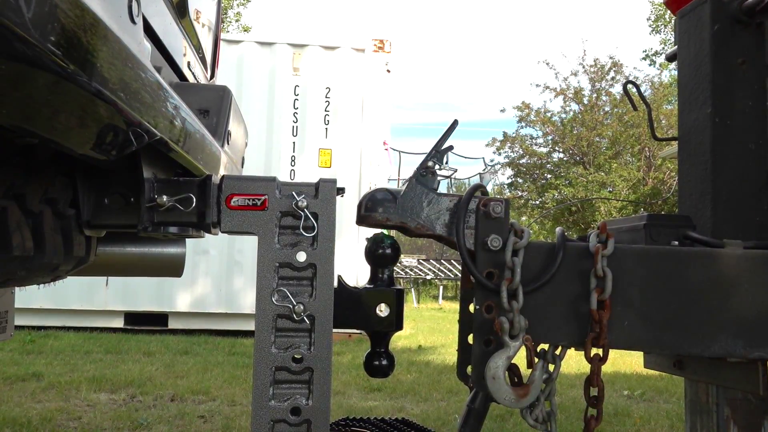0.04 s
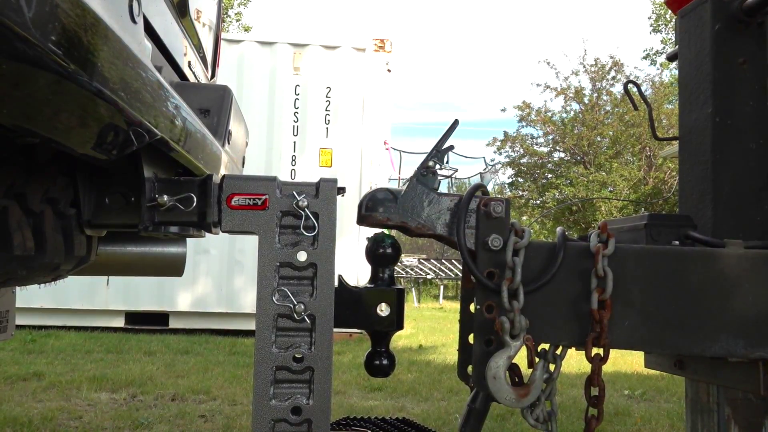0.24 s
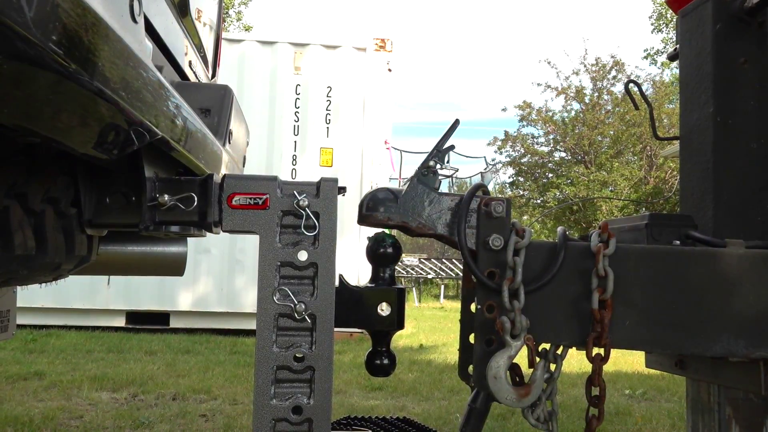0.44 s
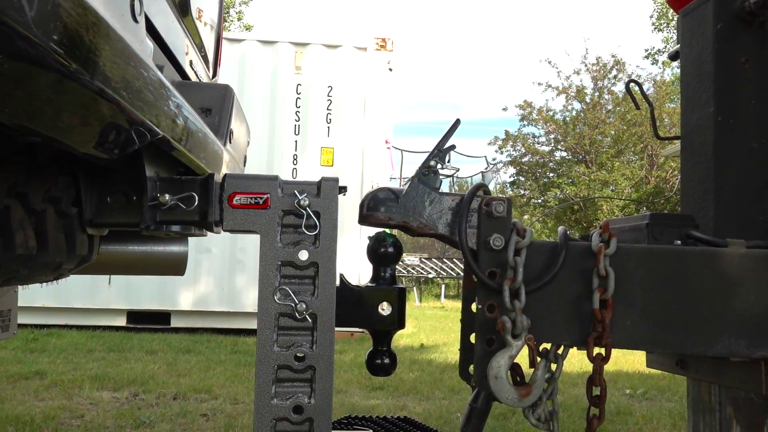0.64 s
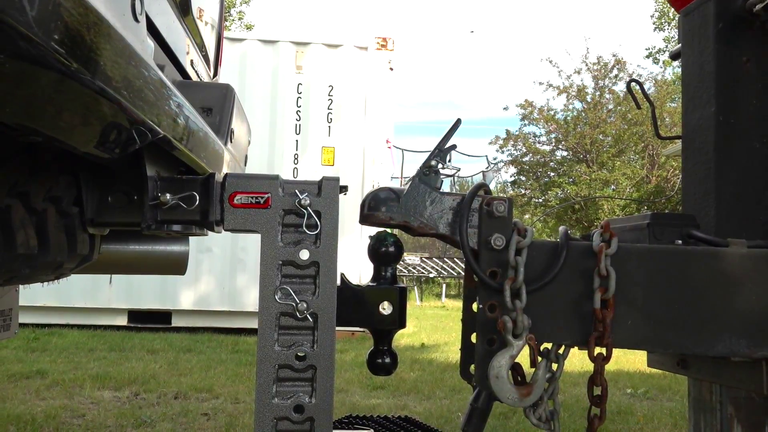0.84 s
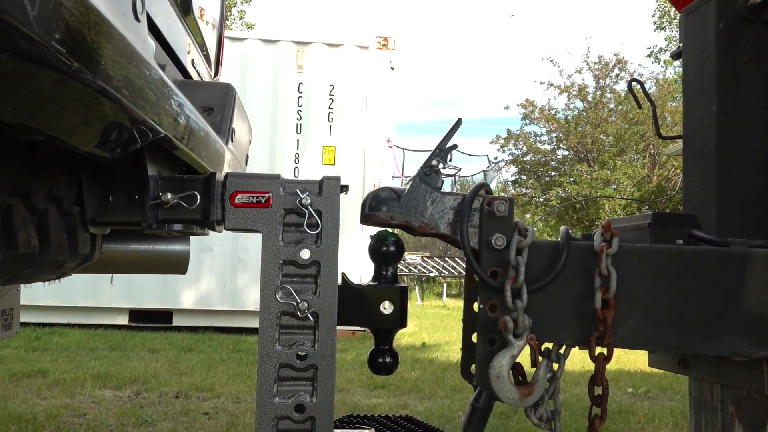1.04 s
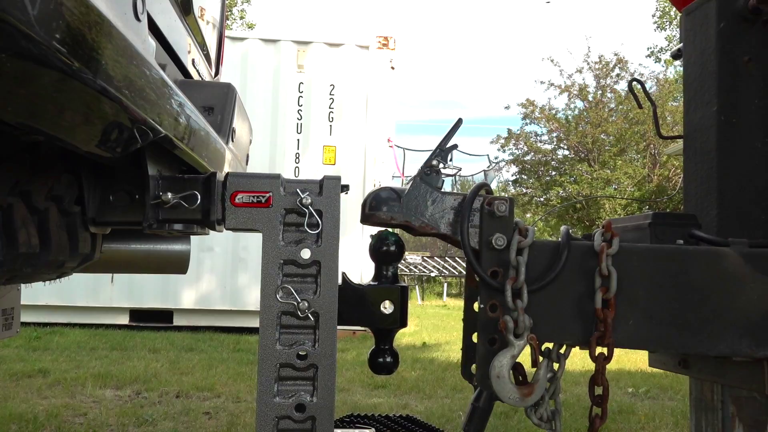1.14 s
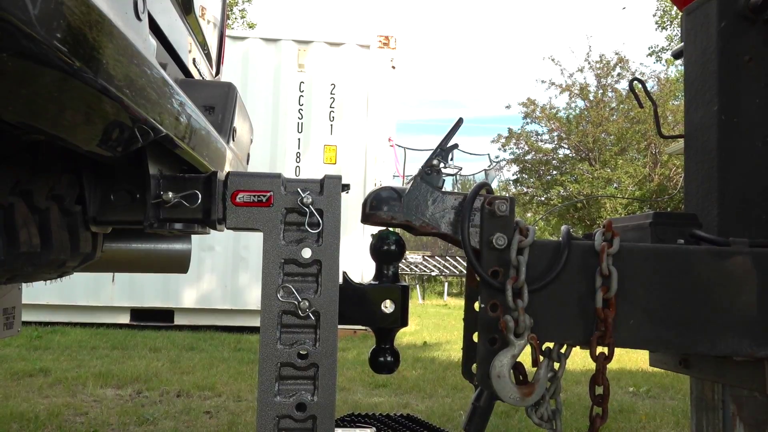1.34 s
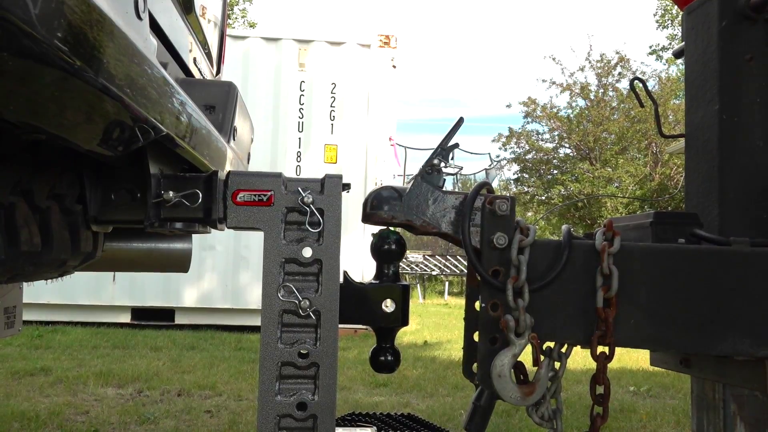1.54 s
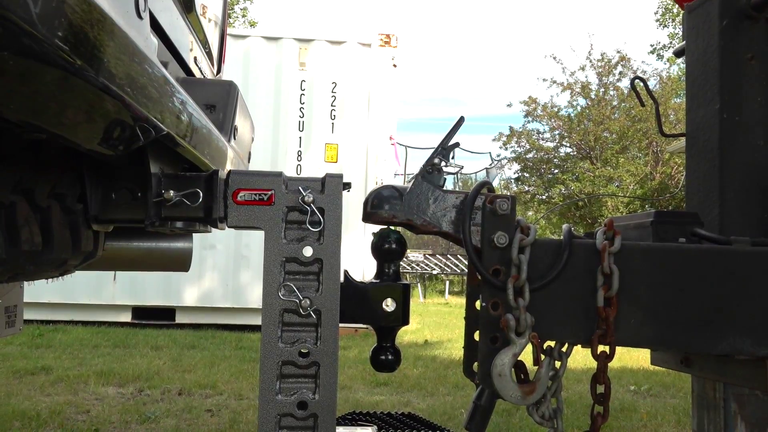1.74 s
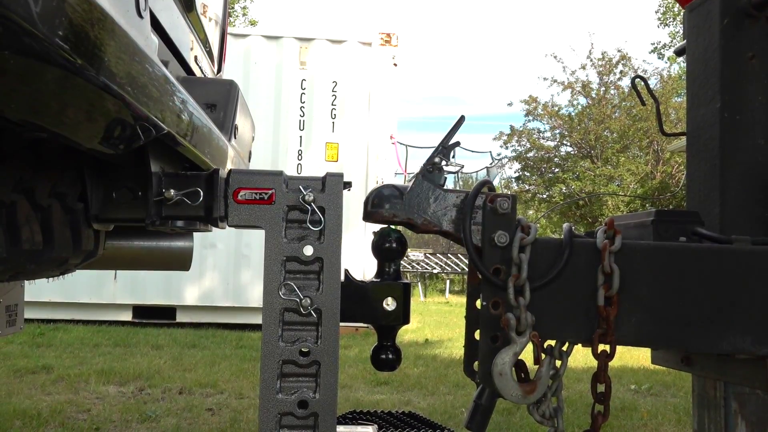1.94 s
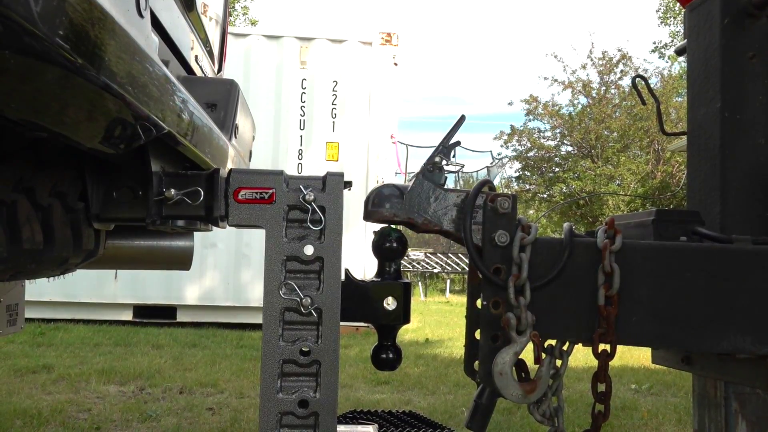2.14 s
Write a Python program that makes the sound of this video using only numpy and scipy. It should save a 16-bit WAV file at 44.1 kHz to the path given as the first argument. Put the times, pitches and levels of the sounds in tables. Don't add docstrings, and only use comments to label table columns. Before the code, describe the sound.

Trailer hitch metal squeaks and scrapes briefly, then clanks and clinks, above a faint engine idle

```python
import sys
import numpy as np
from scipy import signal
from scipy.io import wavfile
from scipy.ndimage import uniform_filter1d

SR = 44100
rng = np.random.default_rng(int(sys.argv[2]) if len(sys.argv) > 2 else 0)


def natural_amplitude(level_db):
    exponent = np.asarray(level_db, float) / 20
    return 10 ** exponent


def bounce(signal):
    frames = np.transpose(np.atleast_2d(signal))
    limited = np.clip(frames, -1, 1)
    pcm = np.round(limited * 32767).astype(np.int16)
    wavfile.write(sys.argv[1], SR, pcm)


N = 97020

# centre_hz, density_db_per_hz
YARD_SPECTRUM = [(95, -6), (180, -16.5), (300, -8.5), (800, -12), (2250, -16.5), (5500, -22), (8000, -53),
                 (16000, -41)]
CYLINDER_LEVELS_DB = [2, -4, -1.5, 1.5, -10.5, 2, -10, -2]
# centre_hz, width_hz, level_db
EXHAUST_MODES = [(40, 22, -6.5), (79.4, 30, -2.5), (90, 18.3, 3.5), (318, 21, -2.5), (410, 110, -8)]
# start_s, length_s, pitch_hz, level_db, strongest_harmonic
SQUEAKS = [(0.022, 0.02, 1355, -46, 0.85), (0.206, 0.059, 1755, -39, 1.49),
           (0.251, 0.041, 1778, -39.5, 1.62), (0.273, 0.059, 1911, -30, 1.43),
           (0.304, 0.038, 3034, -27.5, 0.79), (.337, 0.022, 3122, -19, 0.42),
           (0.351, 0.014, 1524, -28.5, 2), (.388, 0.02, 2210, -32.5, .9), (0.415, 0.035, 1560, -26.5, 2.7),
           (0.436, 0.012, 1403, -25.5, 0.96), (0.484, 0.072, 5910, -38.5, 0.83),
           (0.333, 0.014, 1050, -33.5, 0.72), (0.441, 0.042, 1747, -33.5, 0.59),
           (0.467, 0.075, 1879, -20, 1.4), (0.564, 0.019, 4190, -29, 0.46), (0.567, 0.035, 7180, -35, 0.67),
           (0.616, 0.027, 1603, -48.5, 0.82), (0.655, 0.028, 1867, -42.5, 1.46),
           (0.675, 0.019, 1626, -46.5, 0.89), (1.535, 0.051, 1480, -59.5, 0.83)]
# start_s, length_s, level_db, colour_hz
STROKES = [(0.169, 0.019, -49, 3110), (0.189, 0.018, -52, 1590), (0.224, 0.028, -40, 4580),
           (0.234, 0.27, -45.5, 2200), (0.278, 0.068, -40.5, 3670), (0.306, 0.048, -32.5, 3360),
           (0.336, 0.043, -27.5, 3860), (0.376, 0.039, -29, 3486), (0.406, 0.038, -32, 3664),
           (0.427, 0.029, -27, 3360), (0.483, 0.052, -35.5, 4686), (0.533, 0.16, -55, 3110),
           (0.577, 0.014, -54, 5030), (0.657, 0.02, -47, 2960), (0.698, 0.029, -51.5, 1400),
           (0.37, 0.16, -45, 1000), (1.577, 0.045, -43, 2200), (1.602, 0.088, -59.5, 1100),
           (1.996, 0.072, -64, 3000), (2.046, 0.057, -52, 3840), (1.17, 0.083, -48.5, 695),
           (1.235, 0.19, -58.5, 517), (0.973, 0.24, -68, 4320), (2.008, 0.041, -55, 1100),
           (2.058, 0.031, -55, 890), (0.534, 0.19, -51, 1740)]
# centre_hz, width_hz, level_db
COUPLER_MODES = [(1340, 330, 7), (1934, 12, 7.5), (2200, 6.2, -14), (2960, 250, 3.5), (4040, 120, 3.5),
                 (4550, 47, 5.5), (6167, 59, 3), (7300, 38, -14), (8120, 68, -39.5)]
# start_s, peak_db, colour_hz, t60_s
KNOCKS = [(0.172, -48, 3400, 0.049), (.198, -32, 950, 0.32), (0.205, -26, 3170, 0.083),
          (.664, -32, 3100, 0.054), (1.044, -28.5, 1740, 0.02), (1.127, -30.5, 1710, 0.017),
          (1.18, -14.5, 4400, 0.031), (1.291, -48, 3000, 0.054), (1.543, -45.5, 5300, 0.03),
          (0.283, -33, 3900, 0.053), (0.567, -50.5, 4470, 0.026), (1.449, -35, 5600, 0.073),
          (1.727, -49.5, 6300, 0.037), (1.753, -33.5, 2230, 0.013), (1.828, -50, 4360, 0.097),
          (1.99, -42.5, 4100, 0.036), (2.152, -40.5, 5030, 0.021), (2.163, -40, 5050, 0.054)]
# start_s, length_s, pitch_hz, level_db
CATCHES = [(.209, 0.0099, 3670, -38.5), (.228, .02, 5980, -44.5), (.229, 0.024, 4370, -43),
           (.234, 0.0076, 8950, -52), (.236, 0.013, 7760, -48), (.282, 0.0098, 3586, -35.5),
           (.297, 0.025, 7590, -47.5), (.312, .018, 4270, -41), (.314, .022, 3547, -34),
           (.316, 0.031, 2217, -40.5), (.322, .014, 1318, -40), (.337, 0.011, 3670, -29),
           (.337, .014, 6130, -42), (.344, .013, 3815, -37.5), (.344, .013, 4130, -34.5),
           (.345, .012, 1862, -37.5), (.354, 0.022, 4590, -36.5), (.354, 0.013, 5930, -38),
           (.364, 0.024, 3230, -39), (.373, .014, 1580, -41.5), (.375, 0.027, 3967, -32.5),
           (.381, 0.015, 6270, -35), (.385, .012, 4630, -32.5), (.404, .01, 3760, -35),
           (.405, 0.018, 1618, -35), (.406, 0.029, 6270, -29.5), (.409, 0.03, 7840, -42),
           (.417, 0.025, 4687, -24), (.435, .013, 2710, -43), (.437, 0.0092, 3940, -25),
           (.438, .01, 6700, -39), (.445, 0.015, 2890, -38)]
# start_s, level_db, pitch_hz
THUDS = [
    (0.229, -61, 178),
    (1.059, -61, 188.7),
    (1.201, -61, 157),
    (1.299, -54.5, 129),
    (1.314, -47, 91),
    (2.05, -52.5, 95),
]
# start_s, pitch_hz, level_db, t60_s
RINGS = [(1.044, 881, -37, 0.2), (1.046, 722, -49, 0.3), (1.045, 1787, -37.5, 0.041),
         (1.128, 904, -43.5, 0.16), (1.13, 567, -44, 0.12), (1.24, 757, -36.5, 0.06),
         (1.45, 1050, -51, 0.043), (1.45, 1870, -46.5, 0.058), (1.45, 6510, -41, 0.039),
         (1.45, 7130, -50, 0.054), (1.45, 7700, -42, 0.06), (1.754, 2085, -42.5, 0.042),
         (1.45, 2800, -39, 0.036), (1.582, 2480, -34.5, 0.034), (1.585, 5780, -46.5, 0.15),
         (1.586, 1048, -38, 0.1), (1.589, 1234, -39.5, 0.12), (1.59, 4810, -41.5, 0.049),
         (1.6, 874, -43.5, 0.1), (1.727, 6510, -39, 0.014), (1.755, 3770, -51.5, 0.15),
         (1.755, 7620, -49.5, 0.083), (1.991, 2836, -48.5, 0.05), (1.991, 3790, -52, 0.056),
         (2.163, 6930, -43.5, 0.077), (2.163, 6110, -55, 0.18), (2.163, 4630, -53, 0.088),
         (2.164, 2710, -47, 0.057), (2.165, 1150, -51, 0.077)]
# pitch_hz, level_db, t60_s
HITCH_MODES = [(544, -13, .3), (705, -3, .2), (877, -3, .15), (1593, -10, .065), (1868, -9, .15),
               (1297, -8, .09), (2126, -1, .09), (3585, -2, .05), (4050, 2, .045), (5039, -12, .1),
               (5835, -8, .27), (7000, -13, .1), (8414, -24, .12), (9518, -13, .075)]


def level(x, db):
    return x * natural_amplitude(db) / np.sqrt(np.mean(x ** 2))


def band(x, hz, width_hz):
    return signal.lfilter(*signal.iirpeak(min(hz, 0.4 * SR), max(hz / width_hz, 0.3), fs=SR), x)


def band_twice(x, hz, width_hz):
    return band(band(x, hz, width_hz), hz, width_hz)


def walk(rate_hz, size):
    k = int(SR / rate_hz)
    steps = np.repeat(rng.standard_normal(size // k + 1), k)
    return 1.31 * uniform_filter1d(uniform_filter1d(steps, k), k)[:size]


def swell(size, rise):
    u = np.arange(size) / size
    ramp = np.minimum(u / rise, (1 - u) / (1 - rise))
    return np.sin(np.pi / 2 * np.clip(ramp, 0, 1)) ** 0.91


def decay(t, t60_s):
    return np.exp(-np.log(1000) * t / t60_s)


def ring(t, hz, t60_s):
    rough_db = 4 * min(1500 / hz, 1) ** 2
    rattle = natural_amplitude(rough_db * np.minimum(walk(150, len(t)), 0.5))
    return rattle * np.sin(2 * np.pi * hz * t) * decay(t, t60_s)


def strike_time():
    t = np.arange(int(0.3 * SR)) / SR
    return t, np.minimum(t / 0.00082, 1)


def add(out, x, start_s):
    i = int(start_s * SR)
    out[i:i + len(x)] += x[:N - i]


def add_bouncing(out, x, start_s):
    bounce_s, bounce_db = 0.0097, -19.5
    add(out, x, start_s)
    add(out, x * natural_amplitude(bounce_db), start_s + bounce_s)


def yard():
    drift_db, flicker_db = 0.6, 1.3
    side_db, side_corner_hz, pan_db = -6, 6060, 0
    out, drift = 0, walk(1.82, N)
    table, lr = np.array(YARD_SPECTRUM), np.array([[1], [-1]])
    for hz in 92 * 2 ** np.arange(0, 7.6, 0.5):
        mid = band_twice(rng.standard_normal(N), hz, hz / 2)
        side = band_twice(rng.standard_normal(N), hz, hz / 2)
        db = np.interp(np.log(hz), np.log(table[:, 0]), table[:, 1])
        db = db + drift_db * drift + flicker_db * walk(26, N)
        width = natural_amplitude(side_db) * min(hz / side_corner_hz + 0.18, 1)
        pan = natural_amplitude(-0.5 * pan_db * min(hz / 600, 1) * lr)
        out = out + natural_amplitude(db) * (mid + width * side * lr) * pan
    return level(out, -57.5)


def idle():
    cycle_s, first_firing_s, jitter_s, spread_db = 0.2, 0.072, 0.00043, 1.7
    idle_db, chuff_db, chuff_hz, chuff_width_hz = -63.5, -65.5, 261, 37
    k = np.arange(-8, int(8 * N / SR / cycle_s))
    pad = int(cycle_s * SR)
    firing_s = first_firing_s + cycle_s * (k / 8 + 1) + jitter_s * rng.standard_normal(len(k))
    at = (firing_s * SR).astype(int)
    pulses, chuffs = np.zeros(N + 3 * pad), np.zeros(N + 3 * pad)
    pulses[at] = natural_amplitude(np.array(CYLINDER_LEVELS_DB)[k % 8] + spread_db * rng.standard_normal(len(k)))
    chuffs[at[::8]] = pulses[at[::8]]
    pipe = sum(natural_amplitude(db) * band_twice(pulses, hz, 1.04 * width_hz) for hz, width_hz, db in EXHAUST_MODES)
    chuff = band_twice(chuffs, chuff_hz, chuff_width_hz)
    return level(pipe[pad:pad + N], idle_db) + level(chuff[pad:pad + N], chuff_db)


def squeaks():
    harmonic_fall_db, flutter_db, wobble_depth, sag_per_s = 9.5, 1.5, 0.0084, 0.2
    rise, narrowing = 0.38, 1
    out, wobble = np.zeros(N), walk(150, N)
    flutter = [walk(200, N) for _ in range(6)]
    for start_s, length_s, hz, db, strongest in SQUEAKS:
        i, n = int(start_s * SR), int(length_s * SR)
        sag = sag_per_s * (np.arange(n) - n / 2) / SR
        phase = 2 * np.pi * np.cumsum(hz * (1 + wobble_depth * wobble[i:i + n] - sag)) / SR
        tone = np.zeros(n)
        for k in range(6):
            if (k + 1) * hz < 0.35 * SR:
                fall_db = harmonic_fall_db * hz / 1700 * abs(k + 1 - strongest)
                gain = natural_amplitude(flutter_db * (0.4 + k) * flutter[k][i:i + n] - fall_db)
                bloom = swell(n, rise) ** (1.4 + narrowing * k)
                tone += gain * bloom * np.sin((k + 1) * phase)
        add(out, tone * natural_amplitude(db) * 2, start_s)
    return out


def contact_slips():
    slips_per_s, spread_db = 7000, 2
    slips = (rng.random(N) < slips_per_s / SR) * rng.choice([-1, 1], N)
    slips = slips * natural_amplitude(spread_db * rng.exponential(size=N))
    return level(slips * natural_amplitude(0.66 * walk(110, N)), 0)


def grind():
    stroke_rise, stroke_width, body_db, scrape_db = 0.14, 1.2, -21.5, -10
    streak_db, streak_spread_oct, streak_width_hz, streak_flicker_db = -7, 0.76, 100, 4.5
    slips, drive, streaks = contact_slips(), np.zeros(N), np.zeros(N)
    flicker = [natural_amplitude(streak_flicker_db * walk(130, N)) for _ in range(8)]
    spots = rng.uniform(-1.654, 1.7, (len(STROKES), 8))
    for (start_s, length_s, db, hz), spot in zip(STROKES, spots):
        i, n = int(start_s * SR), int(length_s * SR)
        push = np.pad(slips[i:i + n] * swell(n, stroke_rise) * natural_amplitude(db), (0, 512))
        add(drive, band_twice(push, hz, stroke_width * hz) * np.sqrt(SR / hz), start_s)
        for c, octaves in zip(flicker, spot):
            streak_hz = hz * 2 ** (streak_spread_oct * octaves)
            add(streaks, band(push * c[i:i + len(push)], streak_hz, streak_width_hz), start_s)
    body = sum(natural_amplitude(db) * np.sqrt(hz / width_hz) * band(drive, hz, width_hz)
               for hz, width_hz, db in COUPLER_MODES)
    streaks = streaks * natural_amplitude(streak_db) * np.sqrt(SR / streak_width_hz) / 4
    return body * natural_amplitude(body_db) + drive * natural_amplitude(scrape_db) + streaks


def knocks():
    crack_width, crack_db, top_db = 1.41, -6.5, -13
    body_hz, body_db, body_t60_s = 860, -23.5, 0.18
    out, (t, onset) = np.zeros(N), strike_time()
    for start_s, db, hz, t60_s in KNOCKS:
        hiss, fade = rng.standard_normal(len(t)), decay(t, t60_s)
        crack = level(band_twice(hiss, hz, crack_width * hz), db + crack_db) * fade
        edge = np.diff(hiss, prepend=0) * natural_amplitude(db + top_db) * (hz / 4000) ** 2 * fade ** 2
        body = level(band_twice(hiss, body_hz, 1.3 * body_hz), 0.79 * db + body_db)
        add_bouncing(out, (crack + edge + body * decay(t, body_t60_s)) * onset, start_s)
    return out


def catches():
    rise, wobble_depth, flutter_db = 0.45, 0.006, 2.5
    out, wobble, flutter = np.zeros(N), walk(300, N), walk(500, N)
    for k, (start_s, length_s, hz, db) in enumerate(CATCHES):
        n, i = int(length_s * SR), k * (N // 40)
        phase = 2 * np.pi * np.cumsum(hz * (1 + wobble_depth * wobble[i:i + n])) / SR
        gain = natural_amplitude(db + flutter_db * flutter[i:i + n]) * 2
        add(out, gain * swell(n, rise) * np.sin(phase), start_s)
    return out


def thuds():
    out, n = np.zeros(N), int(0.12 * SR)
    for start_s, db, hz in THUDS:
        add(out, natural_amplitude(db) * swell(n, 0.2) * np.sin(2 * np.pi * hz * np.arange(n) / SR), start_s)
    return out


def link_rings():
    out, (t, onset) = np.zeros(N), strike_time()
    for start_s, hz, db, t60_s in RINGS:
        add(out, natural_amplitude(db) * ring(t, hz, t60_s) * onset, start_s)
    return out


def clank():
    clank_s, clank_db = 1.18, -32
    out, (t, onset) = np.zeros(N), strike_time()
    modes = sum(natural_amplitude(db) * ring(t, hz, t60_s) for hz, db, t60_s in HITCH_MODES)
    add_bouncing(out, modes * natural_amplitude(clank_db) * onset, clank_s)
    return out


def echoes(metal):
    echo_db, t60_s, gap_s = -12.5, 0.11, 0.004
    side_db, side_treble_db = -4, 20.5
    t = np.arange(int(0.4 * SR)) / SR
    tails = rng.standard_normal((2, len(t))) * decay(t, t60_s) * (t > gap_s)
    mid, side = (signal.fftconvolve(metal, x / np.sqrt(np.sum(x ** 2)))[:N] * natural_amplitude(echo_db) for x in tails)
    side = side + natural_amplitude(side_treble_db) * band_twice(side, 12200, 5000)
    return mid, side * natural_amplitude(side_db)


def scene():
    metal = squeaks() + grind() + knocks() + catches() + thuds() + link_rings() + clank()
    metal = signal.lfilter(*signal.butter(1, 60, "high", fs=SR), metal)
    mid, side = echoes(metal)
    pan_db, lr = 3, np.array([[-0.5], [0.5]])
    return (metal + mid) * natural_amplitude(pan_db * lr) - 2 * lr * side + yard() + idle()


def roll_off(x):
    return signal.sosfilt(signal.butter(12, 16500, fs=SR, output="sos"), x)


def record(dry):
    port_corner_hz, limit, top_hz = 300, 0.33, 15900
    mic_top_hz, hiss_db, leak_hz, leak_db, leak_hiss_db = 10340, -74.5, 12400, -17, 16
    mid = (dry[0] + dry[1]) / 2
    side = signal.lfilter(*signal.butter(2, port_corner_hz, "high", fs=SR), dry[0] - dry[1]) / 2
    ports = limit * np.tanh(np.array([mid + side, mid - side]) / limit)
    low = signal.sosfilt(signal.butter(10, mic_top_hz, fs=SR, output="sos"), ports)
    hiss = band(rng.standard_normal(ports.shape), 9000, 9000) * natural_amplitude(hiss_db)
    low_hiss = signal.sosfilt(signal.butter(6, mic_top_hz, fs=SR, output="sos"), hiss)
    treble = ports + (hiss[0] + 0.28 * hiss) * natural_amplitude(leak_hiss_db)
    leak = signal.sosfilt(signal.butter(6, leak_hz, "high", fs=SR, output="sos"), treble)
    heard = low + low_hiss + natural_amplitude(leak_db) * leak
    mix = signal.sosfilt(signal.ellip(8, 0.2, 60, top_hz, fs=SR, output="sos"), heard)
    return roll_off(mix)


dry = scene()
out = record(dry)
bounce(out)
```